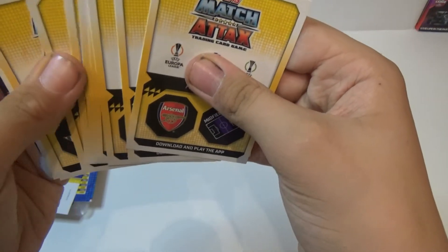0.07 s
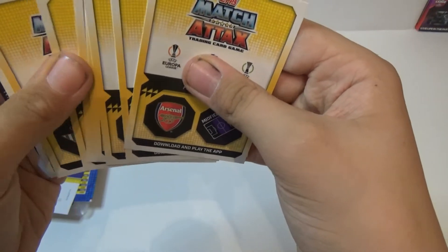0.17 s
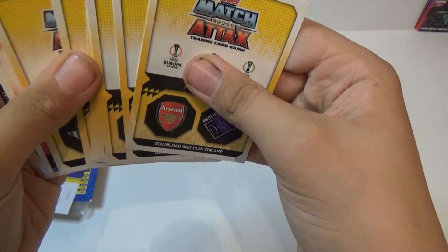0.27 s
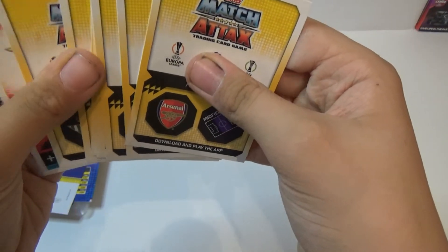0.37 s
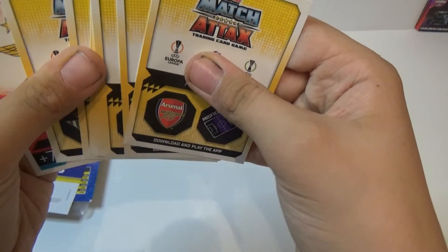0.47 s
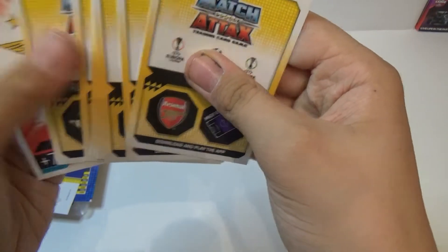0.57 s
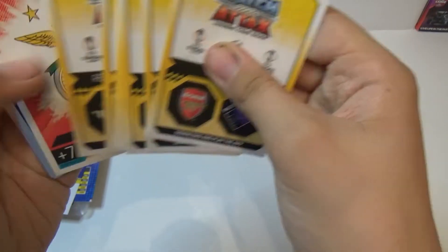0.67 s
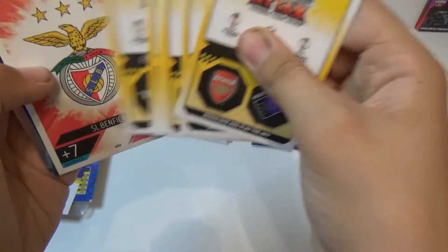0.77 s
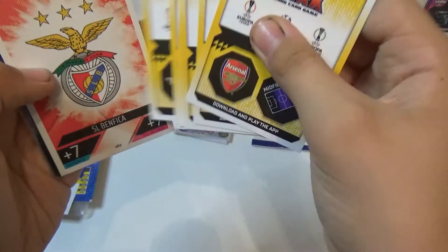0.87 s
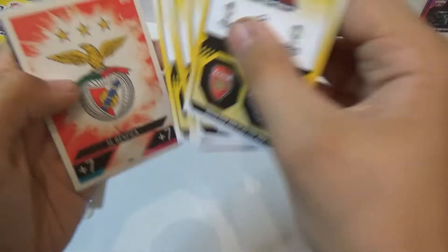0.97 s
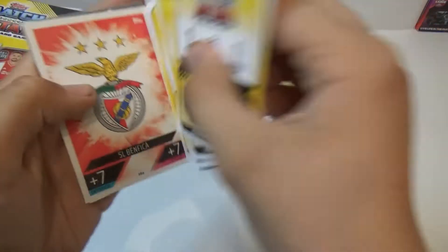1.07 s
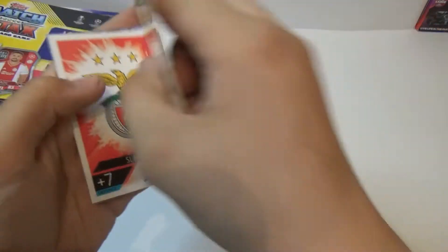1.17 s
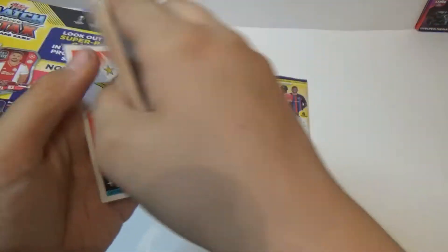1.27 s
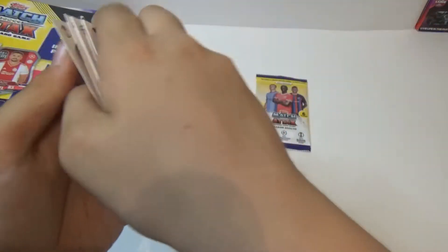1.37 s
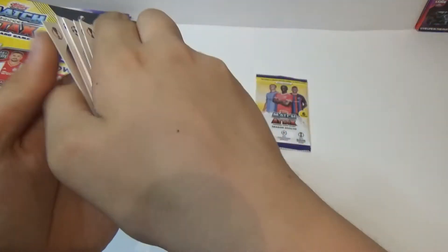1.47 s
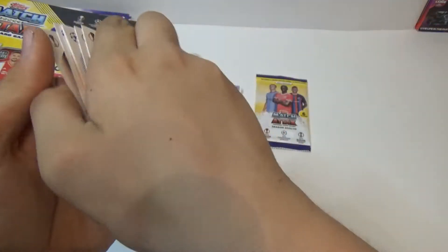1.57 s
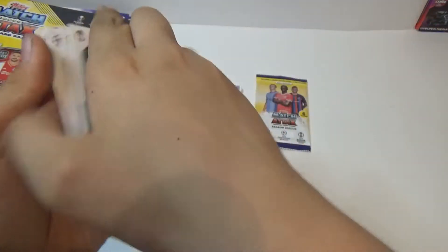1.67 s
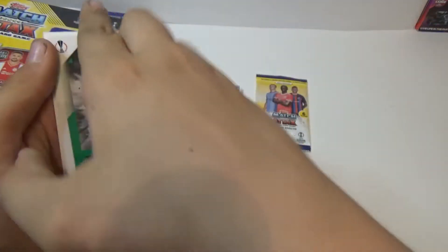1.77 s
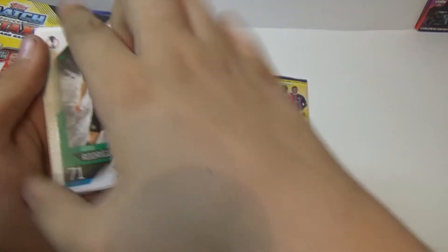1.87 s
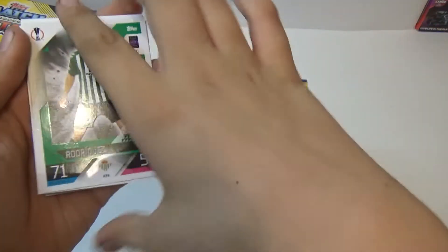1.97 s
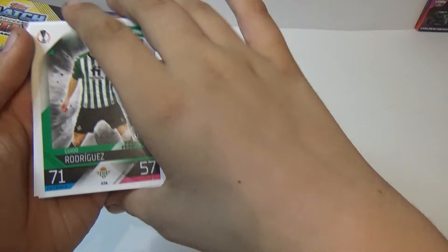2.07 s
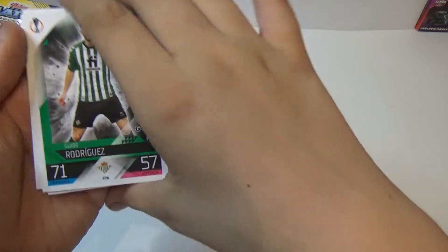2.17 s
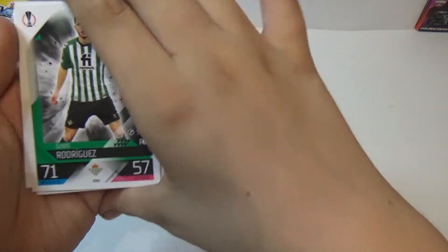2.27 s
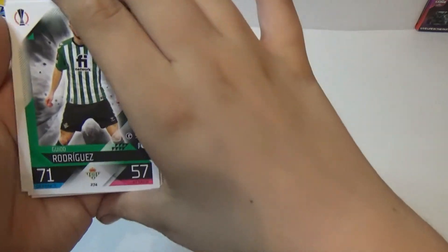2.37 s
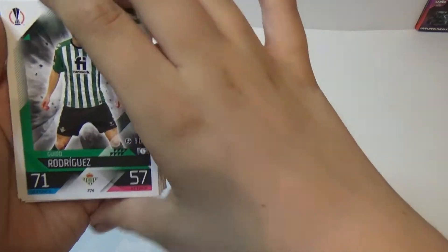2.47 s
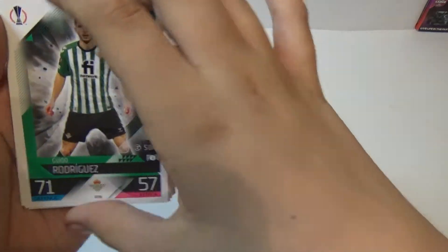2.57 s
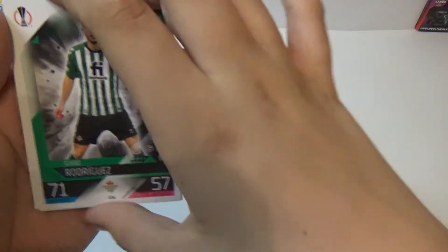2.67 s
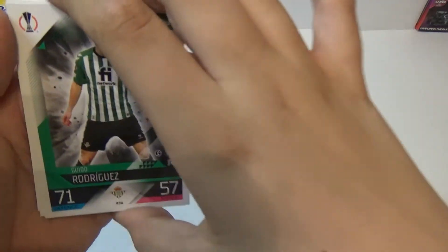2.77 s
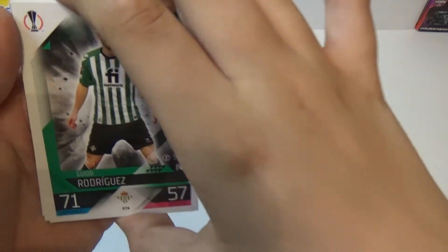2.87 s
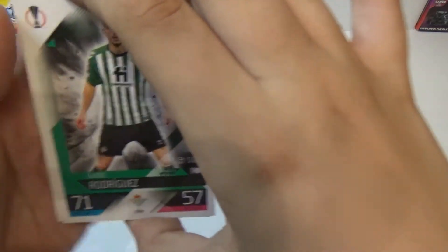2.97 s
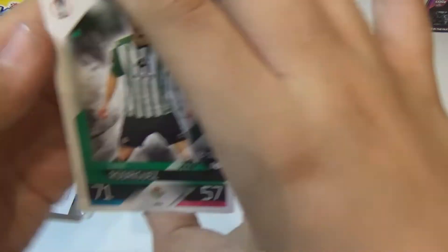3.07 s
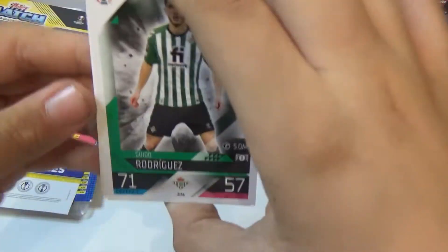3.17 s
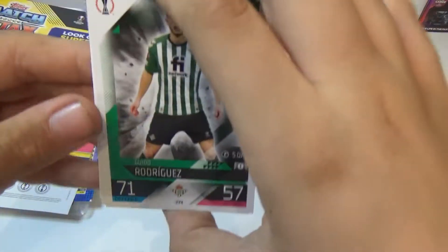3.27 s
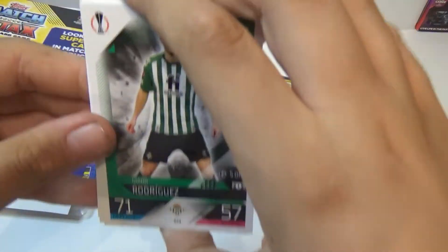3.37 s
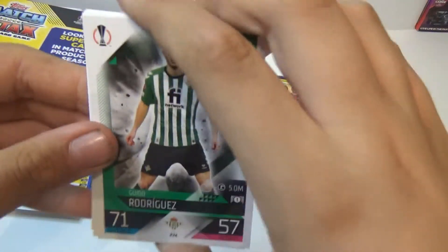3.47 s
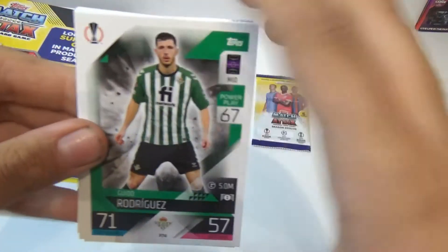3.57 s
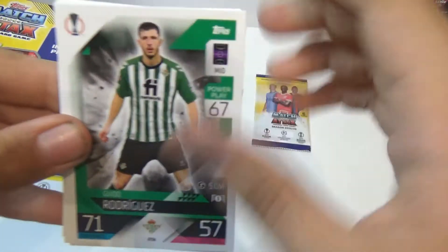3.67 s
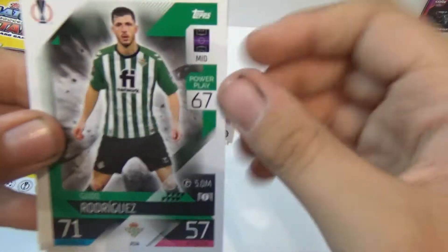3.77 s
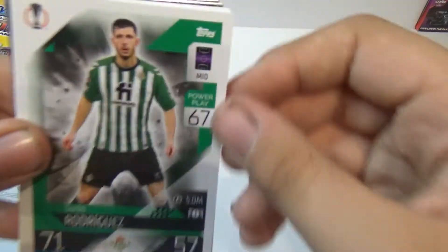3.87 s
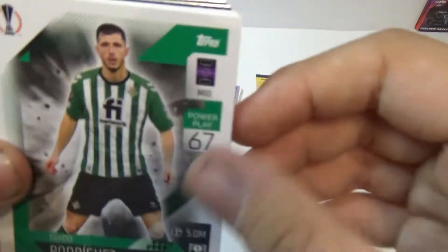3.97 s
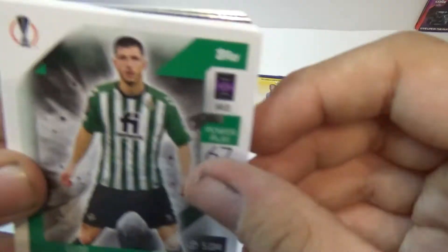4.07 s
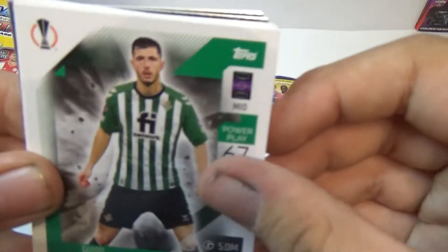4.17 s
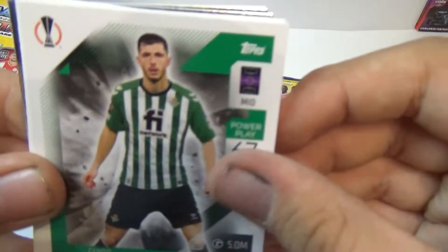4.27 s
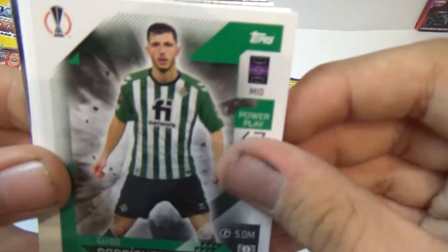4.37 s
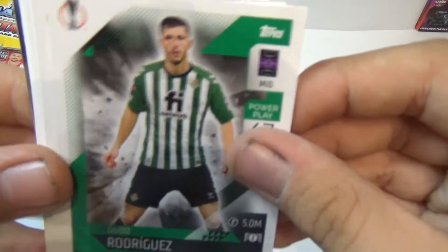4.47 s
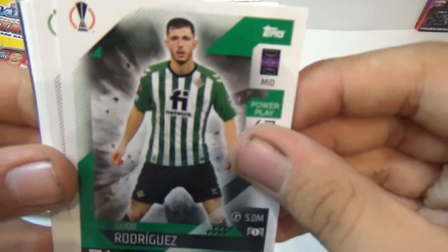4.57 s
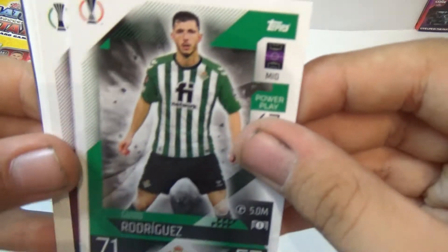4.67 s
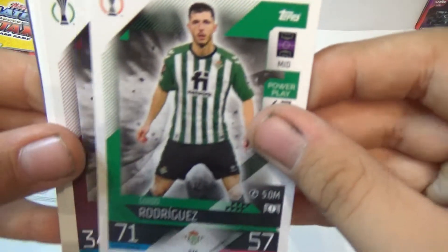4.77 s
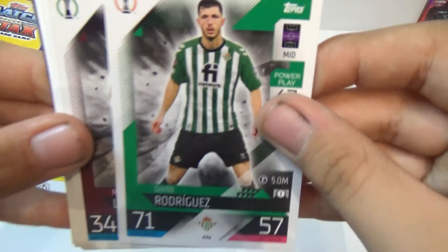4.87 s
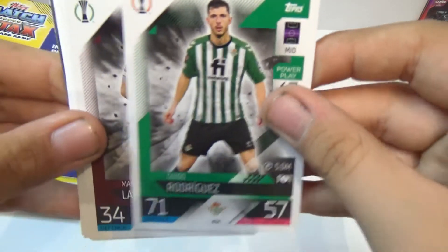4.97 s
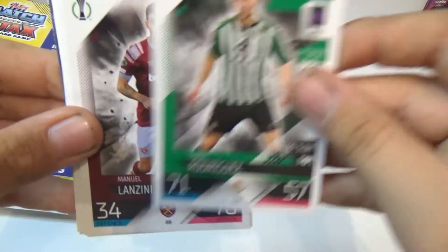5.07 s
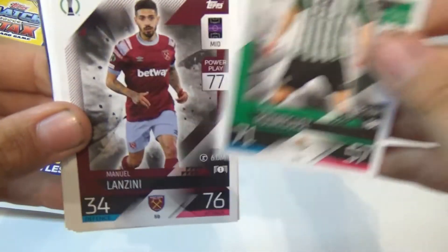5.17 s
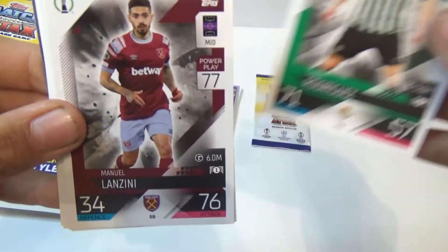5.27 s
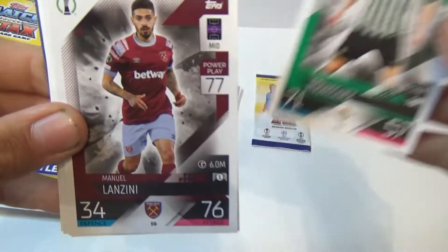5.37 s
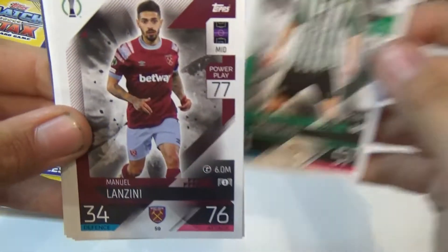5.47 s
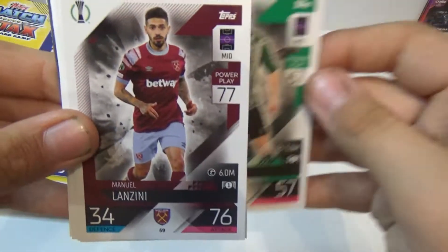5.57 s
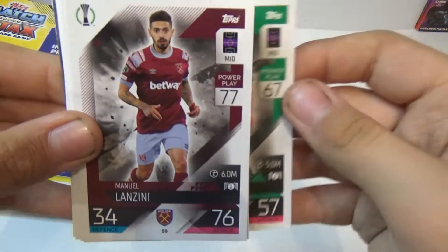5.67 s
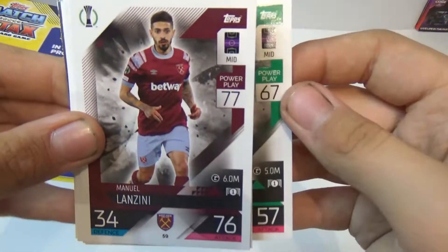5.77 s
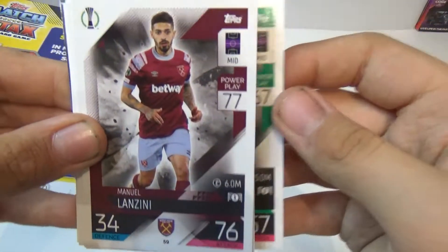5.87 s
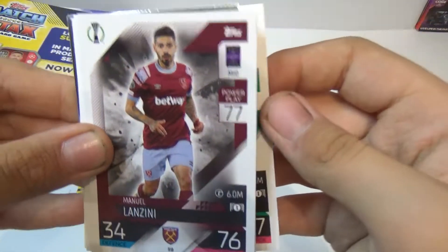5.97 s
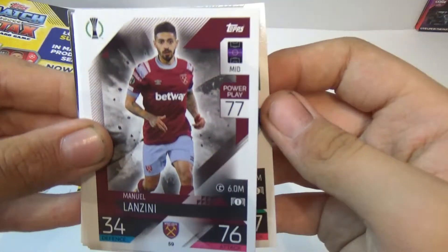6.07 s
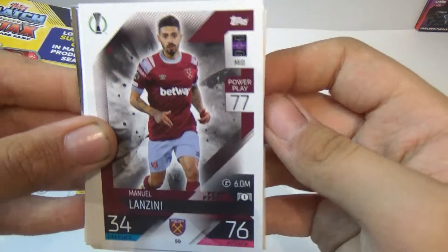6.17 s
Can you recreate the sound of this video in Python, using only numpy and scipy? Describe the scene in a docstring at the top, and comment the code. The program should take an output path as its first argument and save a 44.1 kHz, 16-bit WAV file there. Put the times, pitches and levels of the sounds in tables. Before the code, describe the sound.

Close, dry handling of stiff cards: soft rubbing, a quick sliding clatter, small edge ticks, later a short scrape and sharp snap over faint electrical chirping.

```python
"""Soft room noise, a faint electrical chirp and rubbing fingers open this close scene of trading cards.
Edges tick on the stack, then a fan slides shut, clacks together and is squared up.
Fingers rub on until one card is drawn off, snaps free and is tucked behind; caught edges ring as they slip.
Friction is coloured grains and noise, knocks and rings are decaying tones, and the small room adds
a diffuse tail and one echo."""
import sys
import numpy as np
from scipy import signal
from scipy.fft import rfft, irfft, next_fast_len
from scipy.io import wavfile

SR = 44100
rng = np.random.default_rng(int(sys.argv[2]) if len(sys.argv) > 2 else 0)


def wav_record(signal):
    """Record a signal, one row per channel, as 16-bit PCM in the file named by sys.argv[1]."""
    frames = np.transpose(np.atleast_2d(signal))
    bounded = np.clip(frames, -1, 1)
    # unit amplitude maps onto the largest positive 16-bit level
    quanta = np.round(bounded * 32767).astype(np.int16)
    wavfile.write(sys.argv[1], SR, quanta)


N = 273684
T = np.arange(N) / SR  # time of each sample (s)
FFT_SIZE = next_fast_len(N)
BINS = np.maximum(np.arange(FFT_SIZE // 2 + 1) * SR / FFT_SIZE, 1)  # Hz


def from_db(db):
    """Decibels to gain."""
    return 10 ** (np.asarray(db) / 20)


def rms_one(x):
    """Scale to unit rms."""
    return x / np.sqrt(np.mean(x ** 2) + 1e-20)


def at_bins(points):
    """Read a (Hz, value) table on a log-frequency axis."""
    hz, value = np.transpose(points)
    return np.interp(np.log(BINS), np.log(hz), value)


def colour(x, spectrum, peaks=()):
    """Give a signal a broad spectrum with resonances on top; unit rms."""
    db = at_bins(spectrum)
    for hz, width_hz, peak_db in peaks:
        db = db + peak_db / (1 + (2 * (BINS - hz) / width_hz) ** 2)
    return rms_one(irfft(rfft(x, FFT_SIZE) * from_db(db), FFT_SIZE)[..., :N])


def spread(three, likeness):
    """One shared and two private signals make a stereo pair of the given likeness."""
    alike = np.clip(at_bins(likeness), 0, 1)
    parts = rfft(three, FFT_SIZE)
    pair = np.sqrt(alike) * parts[0] + np.sqrt(1 - alike) * parts[1:]
    return irfft(pair, FFT_SIZE)[:, :N]


def drift(rate):
    """Smooth chance of unit rms that changes about rate times a second."""
    r = np.exp(-2 * np.pi * rate / SR)
    # the first second lets the filter settle
    return rms_one(signal.lfilter([1], [1, -2 * r, r * r], rng.standard_normal(N + SR))[SR:])


def low_pass(x, hz, order=2):
    """Butterworth low-pass."""
    return signal.sosfilt(signal.butter(order, min(hz, .45 * SR), fs=SR, output="sos"), x + 1e-18)


def small_sheet(x, low_hz):
    """A card is too small to radiate bass."""
    return signal.sosfilt(signal.butter(2, low_hz, "high", fs=SR, output="sos"), x + 1e-18)


def friction(per_s, size_db, smooth):
    """Tiny fibre slips at random, a few of them larger, over smooth noise; three unrelated draws."""
    excess = np.minimum(rng.exponential(1, (3, N)), 4)
    sizes = from_db(size_db * excess) * rng.choice([-1, 1], (3, N))
    grains = rms_one(sizes * (rng.random((3, N)) < per_s / SR))
    return grains + smooth * rng.standard_normal((3, N))


def shifting_tint(x, swing_db, per_s, count=20):
    """As the grip moves, the sheet favours ever different narrow bands."""
    place = np.interp(BINS, [600, 13000], [0, count - 1])  # band number across the spectrum
    parts = rfft(x, FFT_SIZE)
    out = 0
    for k in range(count):
        band = np.clip(1 - np.abs(place - k), 0, 1)
        out = out + irfft(parts * band, FFT_SIZE)[:, :N] * from_db(swing_db * drift(per_s))
    return rms_one(out)


def arch(start, length, skew=1):
    """Speed of one stroke from rest to rest; skew above 1 starts gently and stops quickly."""
    return np.sin(np.pi * np.clip((T - start) / length, 0, 1) ** skew).clip(0)


def press(start, length, attack_s, release_s):
    """Pressure that builds, holds and lets go."""
    return np.clip(np.minimum((T - start) / attack_s, (start + length - T) / release_s), 0, 1)


def hoarse_tone(hz, width_hz):
    """A tone of unit rms whose strength and phase keep slipping; hz may glide."""
    phase = 2 * np.pi * np.cumsum(hz + np.zeros(N)) / SR
    return rms_one(drift(width_hz) * np.sin(phase) + drift(width_hz) * np.cos(phase))


def bending_ring(start, modes, travel_s, skew):
    """A blow rings a card; bending waves speed up with the root of pitch, so lows arrive last."""
    out, first = np.zeros((2, N)), int(start * SR)
    age = T[first:first + SR // 8] - start
    for k, (hz, db, t60) in enumerate(modes):
        t = np.maximum(age - travel_s * np.sqrt(10 ** 3 / hz), 0)  # travel_s is the delay at 1 kHz
        size = from_db(db + rng.standard_normal() - 60 * t / t60) * (t > 0)
        # each mode has its own lobes, which reach the two ears out of step
        lobe = skew * rng.choice([-1, 1]) * np.array([[1], [-1]])
        ring = size * np.sin(2 * np.pi * hz * t + lobe * np.tanh(hz * t))
        out[:, first:first + len(t)] += (-1) ** k * ring
    return out


# spectrum of the room's steady noise: (f/Hz, level per Hz/dB)
ROOM_SPECTRUM = [(20, -43), (50, -19.5), (100, -12.5), (190, -5.5), (340, -3), (480, -1.5), (760, -1),
                 (980, -2), (1750, -3.5), (2900, -6.5), (4300, -9), (10500, -15.5), (12400, -15.5),
                 (15900, -17.5)]
# resonances over that noise: (f/Hz, width/Hz, level/dB)
ROOM_RESONANCES = [(1356, 123, 6.2), (2053, 77, 9.1)]
# left-right likeness of the room noise: (f/Hz, likeness/0-1)
ROOM_WIDTH = [(60, 0.9), (150, 0.96), (380, 0.28), (950, 0), (2380, 0), (5980, 0.64), (15000, 1)]


def room_noise(level_db=-54.5):
    """Steady noise of the quiet room, with two soft resonances and a width that varies with pitch."""
    noise = spread(rng.standard_normal((3, N)), ROOM_WIDTH)
    return from_db(level_db) * colour(noise, ROOM_SPECTRUM, ROOM_RESONANCES)


# restless handling, loudest while the cards are loose, fading once the stack is square: (t/s, level/dB)
HANDLING_LEVEL = [(0, -59.5), (0.66, -57), (0.95, -49.5), (1.25, -48), (1.38, -51), (1.56, -52),
                  (2.0, -57.5), (2.7, -62.5), (6.2, -60.5)]
# fingers rub along the stack:
# (start t/s, length t/s, hiss level/dB, resonance of the rubbed card f/Hz, resonance level/dB)
FINGER_RUBS = [(0, 0.19, -62, 5240, -59), (0.035, 0.079, -54.5, 7670, -64), (0.22, 0.039, -50, 5470, -55),
               (0.242, 0.032, -45, 9650, -59), (0.382, 0.2, -57, 10900, -61),
               (0.466, 0.029, -47.5, 9650, -52), (0.582, 0.017, -34.5, 11000, -39),
               (0.659, 0.17, -48.5, 10000, -54), (0.923, 0.097, -66, 9300, -53.5),
               (1.009, 0.023, -36.5, 7900, -43), (1.12, 0.16, -53, 10400, -50.5),
               (1.305, 0.045, -47, 9800, -51), (1.409, 0.125, -50.5, 8960, -55.5),
               (1.589, 0.023, -44, 9300, -40), (1.624, 0.15, -41, 10500, -49),
               (1.685, 0.048, -54, 6980, -47), (1.791, 0.053, -47.5, 4550, -54),
               (1.824, 0.096, -51, 9200, -53), (2.059, 0.054, -47.5, 8790, -63),
               (2.129, 0.056, -49.5, 9300, -64), (2.185, 0.13, -53.5, 9300, -76),
               (2.206, 0.039, -49, 7750, -62), (2.41, 0.053, -55.5, 9300, -63),
               (2.479, 0.093, -59, 9000, -58), (2.487, 0.035, -46, 6460, -54),
               (2.681, 0.11, -53.5, 9470, -56), (2.901, 0.058, -53, 9000, -63),
               (2.95, 0.043, -56, 9470, -71), (3.039, 0.061, -53, 10100, -58), (3.15, 0.08, -54, 4600, -65),
               (3.298, 0.033, -57, 8200, -64), (3.511, 0.046, -45, 9080, -50),
               (3.573, 0.05, -62, 5800, -66), (3.859, 0.077, -49.5, 9000, -55.5),
               (4.008, 0.027, -54, 4220, -51.5), (4.088, 0.034, -54.5, 8000, -59),
               (4.418, 0.068, -67, 6200, -62), (4.447, 0.072, -58, 10650, -57),
               (4.646, 0.062, -54.5, 10100, -64), (4.848, 0.034, -53.5, 10850, -59),
               (5.001, 0.06, -49.5, 5800, -54), (5.1, 0.074, -51.5, 8300, -60),
               (5.514, 0.035, -62, 11000, -61), (5.699, 0.035, -59, 6200, -61),
               (5.875, 0.06, -50.5, 6600, -56), (5.972, 0.045, -55.5, 9800, -62),
               (6.171, 0.059, -51, 4350, -57)]
RUB_ATTACK_S, RUB_RELEASE_S = 0.011, 0.023


def rubbing_gains(swing_db=1, shifts_per_s=9.2, handling_body_db=-3, rub_body_db=-9):
    """Gains of hiss and body under the fingers: the power of restless handling plus single rubs."""
    rustle_db = np.interp(T, *np.transpose(HANDLING_LEVEL)) + swing_db * drift(shifts_per_s)
    rub_power = np.zeros(N)
    for start, length, db, *_ in FINGER_RUBS:
        rub_power += (from_db(db) * press(start, length, RUB_ATTACK_S, RUB_RELEASE_S)) ** 2
    hiss_gain = np.sqrt(from_db(rustle_db) ** 2 + rub_power)
    body_gain = np.sqrt(from_db(rustle_db + handling_body_db) ** 2 + rub_power * from_db(rub_body_db) ** 2)
    return hiss_gain, body_gain


# card slides over card, gathering speed and stopping in one arch:
# (start t/s, length t/s, hiss level/dB, body level re hiss/dB, top of the hiss f/Hz)
CARD_SLIDES = [(1.029, 0.15, -39, -13.5, 13900), (1.161, 0.05, -38.5, -12, 13000),
               (1.183, 0.074, -47, -13, 12000), (1.578, 0.035, -38, -10.5, 11500),
               (1.631, 0.061, -41, -14, 15500), (1.788, 0.1, -47, -11, 16000),
               (3.74, 0.13, -63.5, 7, 12000), (5.621, 0.031, -43.5, -7.5, 9050),
               (5.648, 0.059, -46, -7.5, 9150)]
# spectra of the hiss and of the flexing card's body: (f/Hz, level per Hz/dB)
HISS_SPECTRUM = [(300, -33), (1000, -35), (2400, 0.5), (3300, 1), (4600, 4.5), (6300, 5), (7400, 6),
                 (9500, 9), (10800, 4.5), (12300, -1), (16000, -11)]
BODY_SPECTRUM = [(50, -24), (120, -55), (300, -6.5), (520, -13.5), (760, -1), (1000, -5.5), (1250, -1),
                 (1900, -1.5), (2700, -2.5), (4000, -7), (9000, -22)]
# resonances over the hiss: (f/Hz, width/Hz, level/dB)
HISS_RESONANCES = [(6060, 290, 1), (6200, 380, 1.5), (8600, 320, -1.5), (9200, 250, -2.5)]
# spectrum of a card edge's tick, heard here and in the taps: (f/Hz, level per Hz/dB)
EDGE_TICK_SPECTRUM = [(200, 8), (1200, -4.5), (3000, 1.5), (6000, 7.5), (10000, 6.5), (12500, 0),
                      (16000, -14)]
# left-right likeness of all card friction and ticks: (f/Hz, likeness/0-1)
CARD_WIDTH = [(100, 1), (700, 0.85), (2000, 0.97), (6000, 0.83), (12000, 1)]


def rubs_and_slides(hiss_power=1.43, body_power=0.72):
    """Coated card hisses, the sheet radiates the lower part; loose edges crackle and the grip wavers."""
    grip = from_db(1.3 * drift(80))
    hiss_grains = spread(friction(per_s=4600, size_db=2.5, smooth=1.0), CARD_WIDTH)
    hiss = shifting_tint(colour(hiss_grains, HISS_SPECTRUM, HISS_RESONANCES), swing_db=2.2, per_s=14)
    body = colour(spread(friction(per_s=900, size_db=1.0, smooth=0.63), CARD_WIDTH), BODY_SPECTRUM)
    ticks = spread(friction(per_s=130, size_db=2.0, smooth=0), CARD_WIDTH)
    crackle = small_sheet(colour(ticks, EDGE_TICK_SPECTRUM), low_hz=500)
    hiss_gain, body_gain = rubbing_gains()
    out = hiss_gain * (hiss + .36 * crackle) + body_gain * body
    for start, length, db, body_db, top_hz in CARD_SLIDES:
        speed = arch(start, length)
        # hiss and body grow with different powers of the speed
        slide_hiss = low_pass(speed ** hiss_power * hiss, top_hz)
        slide_body = from_db(body_db) * speed ** body_power * body
        out += from_db(db) * (slide_hiss + slide_body)
    return grip * out


def rub_rings(width_hz=510):
    """Each rub excites one resonance of the card under the finger, set by where it is held."""
    out = np.zeros(N)
    for start, length, _, hz, db in FINGER_RUBS:
        span = slice(max(int(start * SR), 0), int((start + length) * SR))
        band = signal.butter(2, [hz - width_hz / 2, hz + width_hz / 2], "band", fs=SR, output="sos")
        pressure = press(start, length, RUB_ATTACK_S, RUB_RELEASE_S)[span]
        ring = rms_one(signal.sosfilt(band, rng.standard_normal(SR // 2)))
        out[span] += from_db(db) * pressure * ring[-len(pressure):]
    return out


# how the electrical chirp changes, read between rows:
# (t/s, delay in its cycle t/s, relative level/dB, extra level of every second chirp/dB, rise t/s)
CHIRP_COURSE = [(0, .004, 2, -12, .0016), (2.35, .004, 1, -12, .0016), (2.5, .004, -3.5, 0, .0018),
                (4.35, .004, -2, 0, .002), (4.5, -.001, -1.5, 0, .002), (4.8, -.002, -1, 0, .002),
                (4.9, -.003, 0.5, 0, .003), (5.9, -.003, 0.5, 0, .003), (6.0, .004, -1, 0, .002)]


def chirps(level_db=-50, settle_hz=2330, drop_hz=760, hook_s=0.0028):
    """A faint electrical chirp, 25 a second, drops onto a lower pitch; at first every second is weak."""
    starts = np.arange(0, N / SR - .03, .04)
    chance = rng.standard_normal((len(starts), 2)) * [1.5, 70]  # dB, Hz
    when, *columns = np.transpose(CHIRP_COURSE)
    out, t = np.zeros(N), T[:SR // 60]
    waver_hz = 90 * drift(150)
    for k, (s, (louder_db, higher_hz)) in enumerate(zip(starts, chance)):
        late_s, db, weak_db, rise_s = (np.interp(s, when, c) for c in columns)
        first, age = int((s + late_s) * SR), t / rise_s
        hz = settle_hz + higher_hz + drop_hz * np.exp(-t / hook_s) + waver_hz[first:first + len(t)]
        tone = (age * np.exp(1 - age)) ** 2 * np.sin(2 * np.pi * np.cumsum(hz) / SR)
        chirp_db = level_db + db + louder_db + weak_db * (k % 2 == 0)
        out[first:first + len(t)] += from_db(chirp_db) * tone
    return out


def room(x, wall_hz=3300, wet_db=-20, echo_db=-26):
    """A dull diffuse tail, different at each ear, and one echo off a wall."""
    t60, echo_s = .25, .03
    t = T[:SR // 2]
    decay = from_db(-60 * t / t60) * (t > .004)
    tail = low_pass(rng.standard_normal((2, len(t))) * decay, wall_hz)
    tail = tail * from_db(wet_db) / np.sqrt(np.sum(tail ** 2) / 2)
    click = 1. * (np.arange(len(t)) == int(echo_s * SR))
    echo = from_db(echo_db) * low_pass(click, 1400)
    return signal.fftconvolve(x.mean(axis=0)[None], tail + echo, axes=1)[:, :N]


# edges tapping on the stack: (t/s, edge tick level/dB, ring of the cards level/dB)
EDGE_TAPS = [(0.1145, -34, -51), (0.2490, -37, -41), (0.5738, -26, -37), (0.6352, -37, -39),
             (0.6640, -35, -47), (1.0170, -36, -48), (1.0328, -33, -26), (1.0981, -21.5, -17.5),
             (1.0992, -28, -17.5), (1.1056, -21, -20), (1.1078, -27, -28), (1.1235, -36, -33),
             (1.1394, -29, -31), (1.2438, -34.5, -47), (1.3258, -30, -41), (1.3330, -41, -46),
             (1.5480, -43, -52), (1.5915, -33, -44), (1.6085, -38, -46), (1.6295, -34, -48),
             (1.8722, -33, -57), (2.4955, -40, -58), (3.1515, -41, -58), (3.1570, -39, -58),
             (3.3735, -44.5, -63), (4.0728, -35, -66), (4.4605, -35, -64), (5.6222, -33, -42),
             (5.6375, -39, -39), (5.6595, -38, -46), (5.6925, -46, -45), (5.9795, -38, -58),
             (6.0352, -41, -46)]
# modes of the stack: (f/Hz, level/dB, t60/s)
STACK_RING = [(536, -7.5, 0.0072), (800, 2.5, 0.0027), (1214, -3, 0.02), (1530, 0, 0.0077),
              (1890, -3, 0.0098), (2500, 5, 0.0024), (3716, -6, 0.011), (4710, -7.5, 0.012),
              (6650, -35, 0.0073)]


def taps(tick_decay_s=0.0013):
    """Many edges land almost at once: a brief thin crunch, and the stack rings."""
    crunch, rings = np.zeros(N), np.zeros((2, N))
    for s, tick_db, ring_db in EDGE_TAPS:
        first = int(s * SR)
        crunch[first:first + SR // 20] += from_db(tick_db) * np.exp(-T[:SR // 20] / tick_decay_s)
        rings += from_db(ring_db) * bending_ring(s, STACK_RING, travel_s=0.00021, skew=0.042)
    grains = colour(spread(rng.standard_normal((3, N)), CARD_WIDTH), EDGE_TICK_SPECTRUM)
    return small_sheet(crunch * grains + rings, low_hz=245)


# dull knocks of the stack against the hand: (centre t/s, f/Hz, level/dB, half length t/s)
HAND_KNOCKS = [(0.252, 210, -52.5, 0.0038), (0.5776, 695, -42, 0.0016), (0.6376, 480, -51, 0.0015),
               (1.0338, 576, -30.5, 0.001), (1.109, 140, -51.5, 0.0053), (3.627, 117, -55, 0.014),
               (5.622, 292, -42, 0.0012), (5.663, 700, -37.5, 0.00087)]


def thumps():
    """The stack knocks against the hand, which damps it within a cycle or two."""
    out = np.zeros(N)
    for s, hz, db, half in HAND_KNOCKS:
        swell = np.exp(-((T - s) / half) ** 2)
        out += from_db(db) * swell * np.sin(2 * np.pi * hz * (T - s))
    return out


# spectrum of the scraping edges as the fan closes: (f/Hz, level per Hz/dB)
FAN_SPECTRUM = [(100, -50), (300, -28), (700, -8.5), (1250, -2), (2300, -7), (4200, -12), (6500, -3.5),
                (9100, 1.5), (11000, -4.5), (12200, -8), (14300, -14), (16000, -25)]


def fan_closing(left_db=0.1, scrape_db=-30.0, song_s=0.12, pitch_hz=5250, rise_hz_per_s=9500,
                width_hz=380, song_db=-37):
    """A fan slides shut with a grainy scrape; edges sing hoarsely upward as their free part shortens."""
    start_s, length_s = 0.749, 0.17
    grains = spread(friction(per_s=2600, size_db=2.8, smooth=0.55), CARD_WIDTH)
    scrape = shifting_tint(colour(grains, FAN_SPECTRUM), swing_db=2.2, per_s=22)
    scrape = from_db(scrape_db) * arch(start_s, length_s, skew=1.06) ** 1.22 * scrape
    hz = pitch_hz + rise_hz_per_s * np.clip(T - start_s, 0, length_s)
    song = from_db(song_db) * arch(start_s, song_s) * hoarse_tone(hz, width_hz)
    grip = from_db(1.3 * drift(130))
    return from_db([[left_db], [-left_db]]) * grip * (song + scrape)


# an edge catches on its neighbours and judders:
# (start t/s, length t/s, level/dB, top of its sound f/Hz, pitch factor)
EDGE_CATCHES = [(1.505, 0.023, -44.5, 3500, 1.0), (1.672, 0.012, -30.5, 12100, 1.03),
                (1.711, 0.011, -42, 10000, 1.0), (1.756, 0.0068, -49, 7000, 1.1),
                (3.2596, 0.0097, -42.5, 8950, 0.79), (3.265, 0.01, -38, 9500, 0.9),
                (3.517, 0.021, -45.5, 9050, 0.97), (4.011, 0.022, -53.5, 5520, 0.92)]
# resonances of a juddering edge at pitch factor 1: (f/Hz, width/Hz, level/dB)
EDGE_RESONANCES = [(1580, 1200, -11.5), (2486, 1030, -9), (4430, 3000, -7.5), (6780, 1400, -7.5),
                   (9500, 2600, 2)]


def catches(attack_s=0.0015, release_s=0.0058):
    """Stick-slip drives the edge's resonances; a longer free edge lowers, a softer grip dulls them."""
    starts, *_, factors = np.transpose(EDGE_CATCHES)
    pitch = factors[np.maximum(np.searchsorted(starts, T) - 1, 0)]
    judder = np.zeros(N)
    for hz, width_hz, db in EDGE_RESONANCES:
        judder += from_db(db) * hoarse_tone(hz * pitch, width_hz / 2)
    out = np.zeros(N)
    for start, length, db, top_hz, _ in EDGE_CATCHES:
        out += from_db(db) * low_pass(press(start, length, attack_s, release_s) * judder, top_hz)
    return out


# an edge slips free and rings: (t/s, f/Hz, level/dB, overtone level re the tone/dB)
EDGE_SLIPS = [(1.5095, 2540, -36.5, -14), (1.6781, 2550, -26, -5), (1.7155, 4180, -35, 5.5),
              (1.7496, 4470, -32, -17), (3.2598, 2283, -36.5, -7), (3.5205, 4500, -42.5, -10),
              (3.5485, 6300, -44, -25)]


def edge_rings(rise_s=0.0016, overtone_ratio=1.685, jitter_rad=0.074):
    """A caught edge slips free and rings for an instant; the shorter its free part, the higher the pitch."""
    out, t = np.zeros(N), T[:SR // 30]
    swell = t / rise_s * np.exp(1 - t / rise_s)
    for s, hz, db, overtone_db in EDGE_SLIPS:
        first = int(s * SR)
        phase = 2 * np.pi * hz * t + jitter_rad * np.cumsum(rng.standard_normal(len(t)))
        tone = np.sin(phase) + from_db(overtone_db) * np.sin(overtone_ratio * phase)
        out[first:first + len(t)] += from_db(db) * swell * tone
    return out


# a single card flicks free or is pressed flat: (t/s, level/dB, contact softness as low-pass f/Hz)
CARD_FLICKS = [(3.6207, -41.5, 2230), (5.2489, -17, 9500), (5.6225, -35, 4000), (5.659, -41, 5200),
               (6.035, -47, 4530)]
# modes of one held card: (f/Hz, level/dB, t60/s)
CARD_RING = [(246, -13.5, 0.038), (350, -13, 0.064), (540, -8.5, 0.028), (750, -12, 0.047),
             (1385, 0, 0.015), (1400, -44, 0.14), (1650, -17, 0.021), (1950, -1.5, 0.0073),
             (3300, -2, 0.0066), (3860, -0.5, 0.0089), (4280, -5, 0.01), (4800, -2.5, 0.0046),
             (6120, -8, 0.0095), (7500, -10, 0.0042)]


def flicks():
    """A bent card springs straight with a snap that falls in pitch, a little to the right."""
    snaps = np.zeros((2, N))
    for s, db, soft_hz in CARD_FLICKS:
        ring = bending_ring(s, CARD_RING, travel_s=0.00043, skew=0.11)
        snaps += low_pass(from_db(db) * ring, soft_hz)
    return small_sheet(snaps, low_hz=120) * from_db([[-1.6], [1.2]])


def squeak(width_s=.004, pitch_hz=3620, rise_hz_per_s=38000, level_db=-44.5):
    """The glossy face sticks and slips for an instant as the card starts to move."""
    age = T - 5.104
    glide = rise_hz_per_s * np.clip(age, -2 * width_s, 2 * width_s)
    phase = 2 * np.pi * np.cumsum(pitch_hz + glide + 110 * drift(600)) / SR
    # dB of the first four harmonics
    tone = sum(from_db(db) * np.sin(k * phase) for k, db in enumerate([-16, 5.0, 3.5, 0], 1))
    return from_db(level_db) * np.exp(-(age / width_s) ** 2) * tone


# spectra of the drawn card while flat and once bowed: (f/Hz, level per Hz/dB)
FLAT_SPECTRUM = [(80, -45), (300, -12), (900, 2), (1800, -1.5), (5000, -7), (8500, -7), (9600, -1),
                 (12000, -3), (13500, -12), (16000, -21)]
BOWED_SPECTRUM = [(50, -45), (150, -18), (400, -3), (900, 1), (2000, 3.5), (2600, -4), (3500, 4), (6000, 0),
                  (9500, -2.5), (12000, -10), (16000, -24)]


def pull_off(right_db=0.5, flat_db=-37.5, bowed_db=-37, bow_after_s=0.063, bow_time_s=0.01):
    """The card drags harder until it lets go; as it bows, its bright scrape turns dull and hollow."""
    start_s, length_s = 5.126, 0.132
    grains = spread(friction(per_s=3200, size_db=1.6, smooth=0.7), CARD_WIDTH)
    grains = shifting_tint(grains, swing_db=2.4, per_s=30, count=14)
    bowed = .5 + .5 * np.tanh((T - start_s - bow_after_s) / bow_time_s)
    flat_scrape = (1 - bowed) * from_db(flat_db) * colour(grains, FLAT_SPECTRUM)
    bowed_scrape = bowed * from_db(bowed_db) * colour(grains, BOWED_SPECTRUM)
    grip = from_db(1.2 * drift(45))
    drag = arch(start_s, length_s, skew=1.6) ** 0.62
    return from_db([[-right_db], [right_db]]) * grip * drag * (flat_scrape + bowed_scrape)


def scene():
    """Cards slightly left of centre, their room, and the background noise and chirp."""
    # rubbed and caught edges lie further left
    edges = small_sheet(rub_rings() + catches() + edge_rings(), low_hz=600) * from_db([[.8], [-.8]])
    cards = rubs_and_slides() + edges + taps() + thumps() + fan_closing()
    cards = cards + flicks() + squeak() + pull_off()
    return room_noise() + chirps() + cards * from_db([[.45], [-.45]]) + room(cards)


def record(dry):
    """The top is cut steeply at 16 kHz."""
    return signal.sosfilt(signal.ellip(10, .1, 80, 16000, fs=SR, output="sos"), dry)


dry = scene()
out = record(dry)
wav_record(out)
```